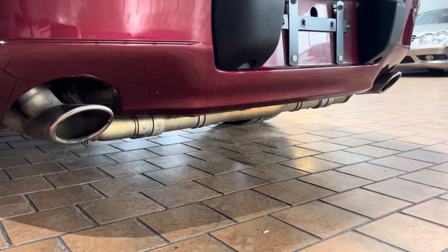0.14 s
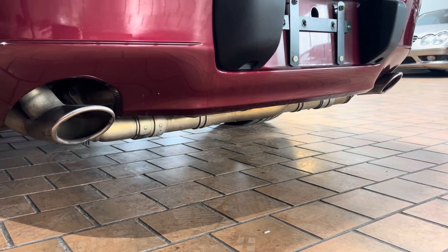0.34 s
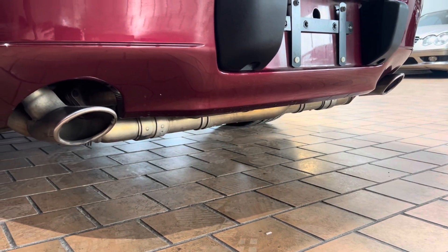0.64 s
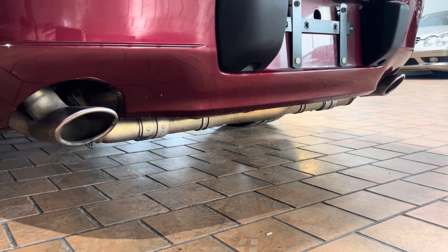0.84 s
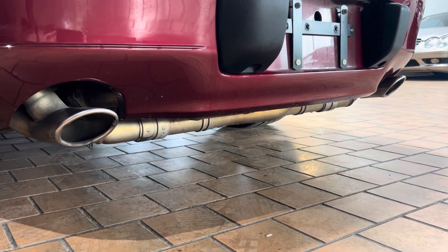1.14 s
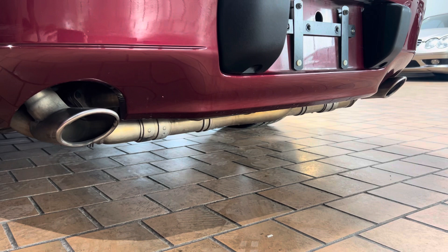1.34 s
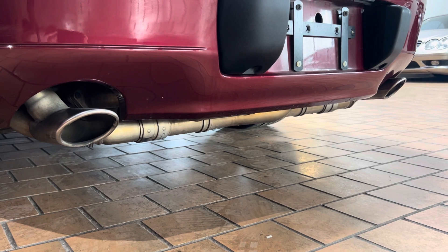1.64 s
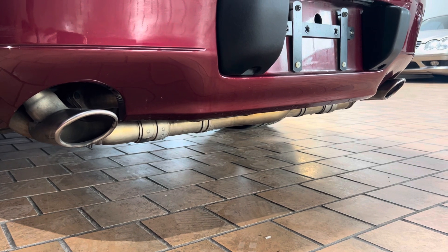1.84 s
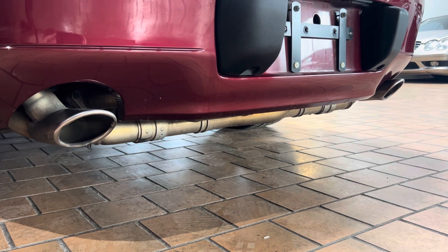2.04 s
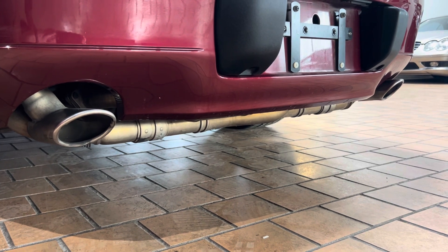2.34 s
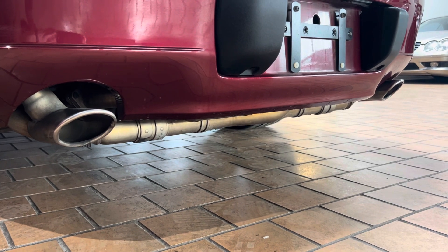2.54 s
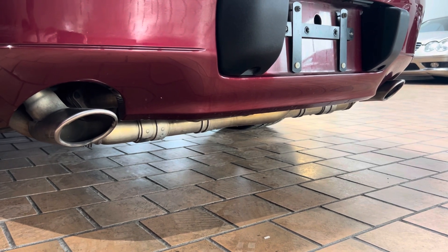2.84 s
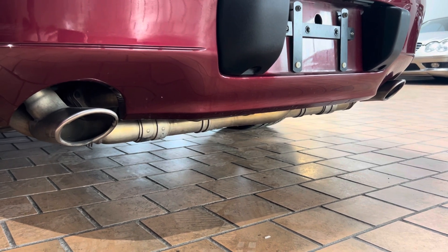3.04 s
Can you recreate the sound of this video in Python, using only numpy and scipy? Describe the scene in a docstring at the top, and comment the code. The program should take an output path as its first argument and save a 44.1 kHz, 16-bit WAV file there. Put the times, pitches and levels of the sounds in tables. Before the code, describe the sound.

Close tailpipe sound of a just-started car engine, hissing loudly and settling to deep, steady idle.

```python
"""A six-cylinder car engine has just caught: it drops from its starting flare to a low, booming idle outdoors.
In the flare, gas hisses, rasps and sizzles from the tailpipe: shaped noise and narrow noise bands.
Two cylinder banks fire in turn: sine harmonics boom, and pulses ring the exhaust as it slows to idle.
Belt whines come in the run-down and at idle, and a small electric motor spins up: faint wavering sines.
Throughout, the hiss throbs and a steady sine of mains hum stands behind."""
import sys
import numpy as np
from scipy import signal
from scipy.fft import rfft, irfft
from scipy.io import wavfile

SR = 44100
rng = np.random.default_rng(int(sys.argv[2]) if len(sys.argv) > 2 else 0)


def to_wav(s):
    """Save 16-bit WAV."""
    ch = np.atleast_2d(s).T  # columns
    pcm = np.round(np.clip(ch, -1, 1) * 32767)  # PCM
    wavfile.write(sys.argv[1], SR, pcm.astype(np.int16))


N = 141120

# gas flow, base levels: (time [s], level of the rush [dB], level of the hiss [dB])
GAS_FLOW = [(0, -20, -25.5), (.12, -18.5, -25), (.3, -24.5, -30.5), (.7, -29.5, -36), (1.05, -33, -41),
            (1.9, -31.5, -40.5), (3.2, -30, -38)]
# colour of the mid-frequency rush: (frequency [Hz], relative level per hertz [dB])
RUSH_COLOUR = [(280, -38), (480, -16.5), (547, -4), (1090, -5.5), (1220, -9), (1560, -11), (2540, -12),
               (2870, -10), (4500, -23), (5850, -30), (9900, -120)]
# crest of the first beat, and how far the valve's opening runs ahead of each beat [turns of one bank]
FIRST_BEAT_TURNS, VALVE_LEAD_TURNS = .33, .22


def from_db(db):
    """Logarithmic level: decibels to amplitude gain."""
    return 10 ** (np.asarray(db) / 20)


def rms_one(x):
    """Normalisation: scale to a root-mean-square of one."""
    return x / np.sqrt(np.mean(x ** 2) + 1e-20)


def in_time(rows, axis=1):
    """Linear interpolation: one column of a time curve at every sample."""
    rows = np.array(rows)
    return np.interp(np.arange(N) / SR, rows[:, 0], rows[:, axis])


def at_hz(points, hz):
    """Logarithmic pitch axis: a spectrum is read between its points on log frequency."""
    f, value = np.transpose(points)
    return np.interp(np.log(hz + 1e-3), np.log(f), value)


def drift(rate):
    """Low-passed chance: noise through a double pole at the rate [Hz], with a spread of one."""
    step = 40  # samples between the points of the slow curve
    settle = 2000  # points dropped while the filter settles
    r = np.exp(-2 * np.pi * step * rate / SR)
    white = rng.standard_normal(N // step + settle + 2)
    slow = signal.lfilter([1], [1, -2 * r, r * r], white)[settle:]
    return np.interp(np.arange(N) / step, np.arange(len(slow)), rms_one(slow))


def noise(spectrum):
    """Spectral shaping: coloured noise of RMS one, falling steeply beyond the ends of its spectrum."""
    hz = np.fft.rfftfreq(N, 1 / SR) + 1
    low_edge = (spectrum[0][0] / hz) ** 20
    high_edge = (hz / spectrum[-1][0]) ** 20
    edges = 1 / np.sqrt((1 + low_edge) * (1 + high_edge))
    white = rfft(rng.standard_normal(N))
    return rms_one(irfft(white * from_db(at_hz(spectrum, hz)) * edges, N))


def resonate(x, hz, width):
    """Damped resonance: a pole pair whose bandwidth sets the decay, with gain one on top."""
    r = np.exp(-np.pi * width / SR)
    zeros = np.array([1, 0, -1]) * (1 - r * r) / 2
    poles = [1, -2 * r * np.cos(2 * np.pi * hz / SR), r * r]
    return signal.lfilter(zeros, poles, x + 1e-18)


def tone(turns, spread=1):
    """Simple harmonic motion: a sine of RMS one, its starting phase random within the spread [turns]."""
    start = spread * (rng.random() - .5)
    return np.sqrt(2) * np.cos(2 * np.pi * (turns + start))


def revs(speed):
    """Normalised engine speed: 0 at the slowest, 1 at the fastest."""
    return (speed - speed.min()) / np.ptp(speed)


def exhaust_note(speed, turns):
    """Harmonic synthesis: multiples of the bank rate, coloured by the muffler, unsteady in the run-down."""
    # beat between the banks: (time [s], level [dB])
    beat_level = [(0, -20), (.1, -23), (.24, -23.5), (.34, -22), (.5, -35), (.72, -44), (1.3, -58)]
    # boom at the firing rate: (time [s], level [dB])
    boom_level = [(0, -19.5), (.15, -30.5), (.4, -28), (.62, -24), (.76, -21.5), (.83, -40), (.92, -24),
                  (1.12, -22), (1.28, -19), (1.48, -17), (1.75, -16), (1.95, -14.5), (2.75, -15),
                  (3.2, -16)]
    # drone at twice the firing rate: (time [s], level [dB])
    drone_level = [(0, -22), (.12, -20.5), (.26, -32.5), (.44, -19), (.6, -23.5), (.74, -40), (1.3, -39),
                   (3.2, -27)]
    # base level of the higher overtones: (time [s], level [dB])
    overtone_level = [(0, -22.5), (.17, -29.5), (.32, -30), (.55, -29), (.85, -38.5), (1.55, -38),
                      (2, -34.5), (3.2, -36)]
    # added level of each overtone: (multiple of the bank rate, in the flare [dB], at idle [dB])
    overtone_mix = [(3, -3.5, 5), (5, -12, 3.5), (6, -16, -1.5), (7, -0.5, 0), (9, -3, -5), (13, -12, -5),
                    (15, -25, -5.5), (16, -27, -5), (19, -35, -6), (21, -4.5, -16), (25, -4, -33),
                    (28, -6, -12.5)]
    # Gaussian dip and peaks of the muffler: (centre [Hz], half-width at 1/e [Hz], height [dB])
    muffler = [(243, 24, -15), (383, 10, 7.5), (535, 35, 6)]
    flare_curve = 2.2  # how quickly the flare's colour leaves as the speed falls
    waver_spread_db, smear_turns = 1.6, .7
    stumble_db, stumble_turns = 3, .12  # uneven burning: swing at overtone 20 in mid run-down

    beat = from_db(in_time(beat_level)) * tone(turns)
    boom = from_db(in_time(boom_level)) * tone(2 * turns, spread=0)
    drone = from_db(in_time(drone_level)) * tone(4 * turns, spread=0)
    out = beat + boom + drone
    level_db = in_time(overtone_level)
    flare = revs(speed) ** flare_curve
    for multiple, flare_db, idle_db in overtone_mix:
        k = round(multiple)
        stumble = np.sin(np.pi * revs(speed)) * k / 20
        muffler_db = sum(db * np.exp(-((k * speed - hz) / width) ** 2) for hz, width, db in muffler)
        mix_db = flare * flare_db + (1 - flare) * idle_db
        waver_db = waver_spread_db * drift(6.7) + stumble_db * stumble * drift(10.4)
        wobble = stumble_turns * stumble * drift(19)
        cycles = k * (turns + VALVE_LEAD_TURNS) + wobble
        out += from_db(level_db + mix_db + muffler_db + waver_db) * tone(cycles, spread=smear_turns)
    return out


def pipe_ring(turns):
    """Impulse response: uneven firings, strong and weak bank in turn, strike the exhaust's resonances."""
    # exhaust resonances: (frequency [Hz], bandwidth [Hz], relative level [dB])
    pipe_modes = [(286, 26, 1), (395, 20, 9), (407, 35, 6.5), (716, 30, 5.5)]
    ring_db, firing_spread_db, weak_bank_gain = -13.5, 3.5, 0.61
    firing = np.floor(2 * (turns + VALVE_LEAD_TURNS))
    at = np.flatnonzero(np.diff(firing)) + 1
    strength = from_db(firing_spread_db * rng.standard_normal(len(at)))
    pulses = np.zeros(N)
    pulses[at] = strength * np.where(firing[at] % 2, weak_bank_gain, 1)
    rings = np.zeros(N)
    for k, (hz, width, db) in enumerate(pipe_modes):
        rings += from_db(db) * (-1) ** k * resonate(pulses, hz, width)  # alternating polarity
    return from_db(ring_db + in_time(GAS_FLOW)) * rms_one(rings)


def gas(turns):
    """Modulated flow noise: puffs follow the nearer bank, a rush every firing, the hiss its own throb."""
    # colours of the hiss, the top air and the puffs: (frequency [Hz], relative level per hertz [dB])
    hiss_colour = [(3500, 2.5), (5500, -1.5), (6300, 1), (7300, -2), (8100, -1), (8900, -14)]
    air_colour = [(9000, -82), (10300, -18), (11200, -1), (12500, 2), (14200, 0), (15500, -23)]
    puff_colour = [(20, -23), (45, 15), (90, -12), (170, 5), (245, 0), (350, 1), (480, -2.5), (700, -51)]
    rush_db, hiss_db, air_db, puff_db = -1.5, 0, -8, -1
    puff_depth, rush_depth = .42, .1  # modulation as a share of the mean
    # a rate of its own, perhaps from a pulsed valve
    throb_hz, first_crest_s, throb_swing_db = 10.2, .021, 1.3
    flutter_spread_db = .8

    bank = np.cos(2 * np.pi * turns)
    firing = np.cos(4 * np.pi * turns)
    puffs = from_db(puff_db) * noise(puff_colour) * (1 + puff_depth * bank)
    rush = from_db(rush_db) * noise(RUSH_COLOUR) * (1 + rush_depth * firing)
    hiss = from_db(hiss_db) * noise(hiss_colour) + from_db(air_db) * noise(air_colour)
    throb_db = throb_swing_db * np.cos(2 * np.pi * throb_hz * (np.arange(N) / SR - first_crest_s))
    hiss_level_db = in_time(GAS_FLOW, axis=2) + flutter_spread_db * drift(23) + throb_db
    return from_db(in_time(GAS_FLOW)) * (puffs + rush) + from_db(hiss_level_db) * hiss


def rasp(speed, turns):
    """Exponential decay: at high revs each firing of the nearer bank spits a short, uneven gas burst."""
    rasp_db, spread_db, decay_s = 5, 5, .002
    beat, part = np.divmod(turns + VALVE_LEAD_TURNS + 1, 1)
    chance = 2 * rng.random(int(beat[-1]) + 1) - 1
    strength_db = spread_db * chance[beat.astype(int)]
    burst = np.exp(-part / speed / decay_s)  # part / speed is the time since the firing
    return from_db(rasp_db + in_time(GAS_FLOW) + strength_db) * revs(speed) * burst * noise(RUSH_COLOUR)


def sizzle(speed):
    """Resonant jet noise: a bright sizzle at the pipe's lip and a hoarse pipe resonance fade with speed."""
    # bright bands: (frequency [Hz], half the bandwidth of each of two cascaded stages [Hz])
    sizzle_modes = [(6360, 93), (6970, 100), (7400, 370)]
    bright_db, bright_fall = -28.5, 1.5  # level at top speed [dB], fall [dB per Hz of bank rate]
    hoarse_db, hoarse_fall = -30, 0.93  # the same for the hoarse band
    hoarse_hz, hoarse_width_hz = 1897, 210  # bandwidth of each of two cascaded stages
    white = rng.standard_normal(N)
    slowed = speed.max() - speed
    bands = sum(resonate(resonate(white, hz, 2 * width), hz, 2 * width) for hz, width in sizzle_modes)
    bright = from_db(bright_db - bright_fall * slowed) * rms_one(bands)
    band = resonate(resonate(white, hoarse_hz, hoarse_width_hz), hoarse_hz, hoarse_width_hz)
    hoarse = from_db(hoarse_db - hoarse_fall * slowed) * rms_one(band)
    return bright + hoarse


def whines(speed, turns):
    """Geared rotation: belt-driven parts sing at multiples of the bank rate; a motor spins up on its own."""
    # belt whines at idle and in the run-down: (multiple of the bank rate, curve of (time [s], level [dB]))
    belt_whines = [(47.87, [(.9, -51), (1.15, -48), (1.32, -42), (1.54, -46), (1.77, -39), (3.2, -40.5)]),
                   (62.5, [(.5, -60), (.59, -43), (.76, -36.5), (.81, -48), (1, -80)])]
    # small electric motor: (time [s], frequency [Hz], level [dB])
    motor = [(.9, 2130, -65), (1.35, 2222, -49), (1.85, 2251, -44), (3.2, 2268, -45)]
    waver_spread_db, jitter_turns = 1.8, .025
    parts = [(multiple * turns, in_time(level)) for multiple, level in belt_whines]
    motor_cycles = np.cumsum(in_time(motor)) / SR
    parts.append((motor_cycles, in_time(motor, axis=2)))
    out = np.zeros(N)
    for cycles, db in parts:
        gain = from_db(db + waver_spread_db * drift(16))
        out += gain * tone(cycles + jitter_turns * drift(22))
    return out


def mains_hum():
    """Steady oscillation: one sine of mains hum at 100 Hz and -31 dB."""
    return from_db(-31) * tone(100 * np.arange(N) / SR)


def scene():
    """Direct and scattered fields: two ports hear the engine, the paving and the car's underside."""
    # engine speed: (time [s], firings of one bank per second [Hz])
    speed_curve = [(0, 43.5), (.14, 43.2), (.25, 41.4), (.37, 39.5), (.55, 34.2), (.75, 27.5), (.85, 25.7),
                   (1.05, 24.4), (1.38, 22.95), (1.6, 22.55), (1.85, 22.95), (2.3, 23.08), (2.68, 23.0),
                   (2.92, 23.45), (3.2, 23.75)]
    # stereo width: (frequency [Hz], side relative to mid [dB])
    width_curve = [(60, -24), (330, -18), (760, -9), (1400, -3), (2700, -7.5), (6400, -6.5), (8000, -13.5),
                   (9700, 25.5), (12000, -6.5)]
    # share of the side that is a phase shift between the ports: (frequency [Hz], share signed by which leads)
    port_shift = [(1100, 1), (3100, 0.46), (5600, -0.49), (7500, 0.85), (9000, 1), (13000, -.85)]
    # lean to the left: (frequency [Hz], left over right [dB])
    left_lean = [(50, 1), (500, 1.6), (3000, 1.3), (8000, 0)]

    speed = in_time(speed_curve) * (1 + .00099 * drift(3.8))
    turns = np.cumsum(speed) / SR - FIRST_BEAT_TURNS
    mid = exhaust_note(speed, turns) + pipe_ring(turns) + gas(turns) + rasp(speed, turns)
    mid += sizzle(speed) + whines(speed, turns) + mains_hum()
    scattered = gas(turns) + pipe_ring(turns) + whines(speed, turns)  # fresh random draws

    hz = np.fft.rfftfreq(N, 1 / SR)
    shift = np.clip(at_hz(port_shift, hz), -1, 1)
    lean = from_db(at_hz(left_lean, hz) / 2)  # half to each channel
    mid_spectrum = rfft(mid)
    shifted = 1j * shift * mid_spectrum  # a quarter turn from the mid
    side = from_db(at_hz(width_curve, hz)) * (shifted + np.sqrt(1 - shift ** 2) * rfft(scattered))
    left, right = (mid_spectrum + side) * lean, (mid_spectrum - side) / lean
    return irfft(np.array([left, right]), N)


def record(dry):
    """Saturation and band-limiting: the highest peaks are rounded and the top is cut."""
    loudest = .95
    rounded = dry / (1 + (dry / loudest) ** 8) ** (1 / 8)
    # 70 dB down from 16300 Hz
    low_pass = signal.cheby2(12, 70, 16300, fs=SR, output="sos")
    return signal.sosfilt(low_pass, rounded)


dry = scene()
out = record(dry)
to_wav(out)
```